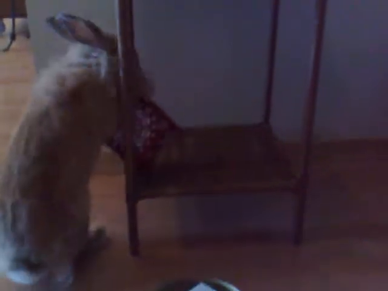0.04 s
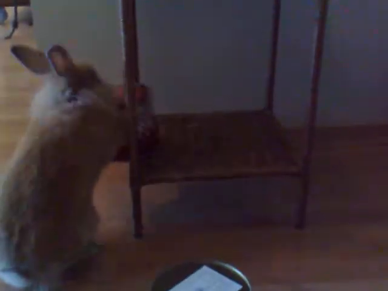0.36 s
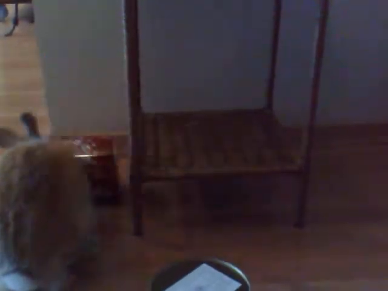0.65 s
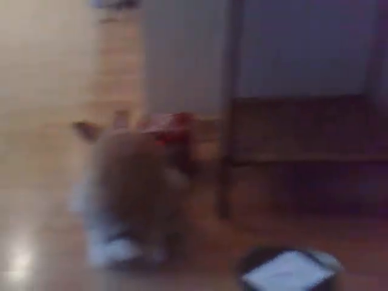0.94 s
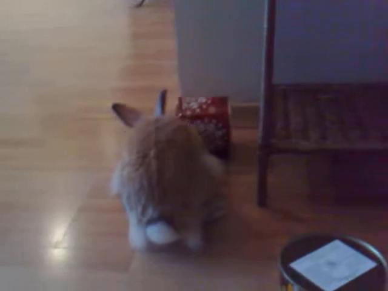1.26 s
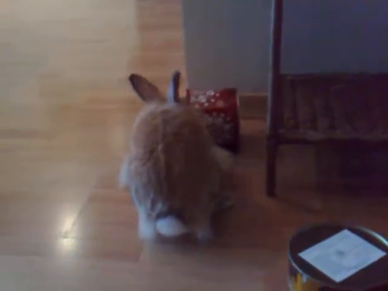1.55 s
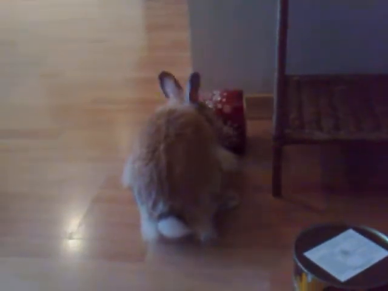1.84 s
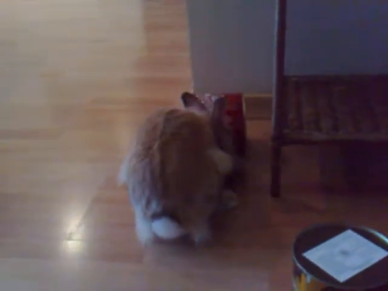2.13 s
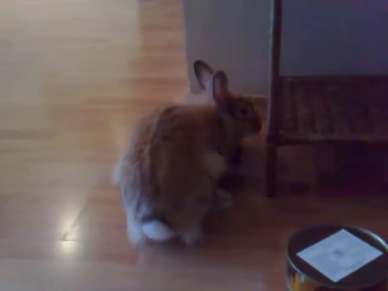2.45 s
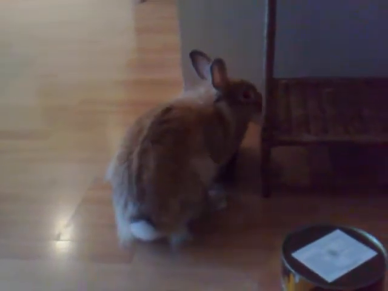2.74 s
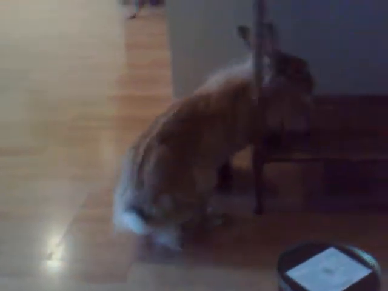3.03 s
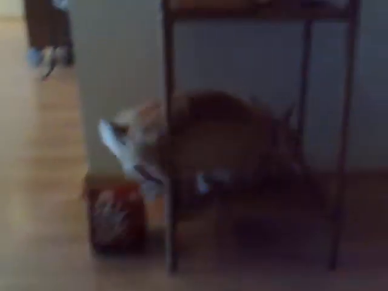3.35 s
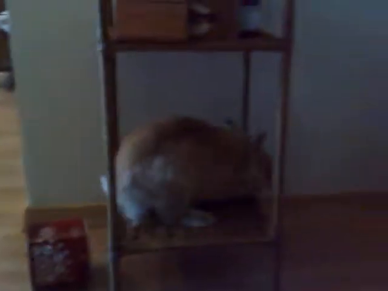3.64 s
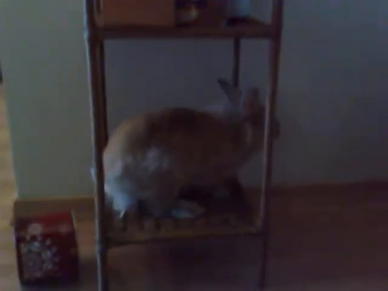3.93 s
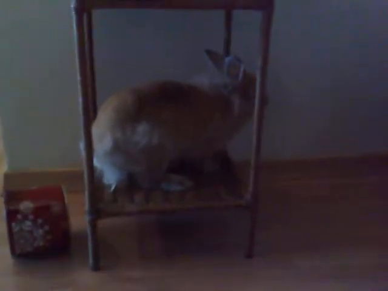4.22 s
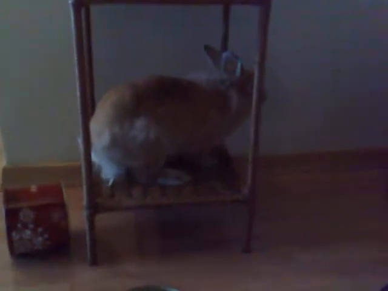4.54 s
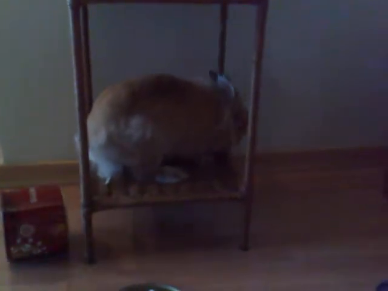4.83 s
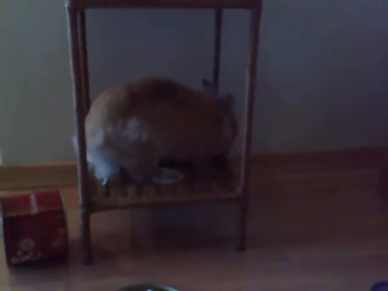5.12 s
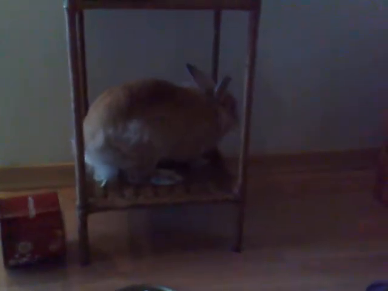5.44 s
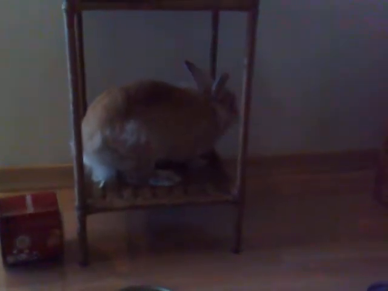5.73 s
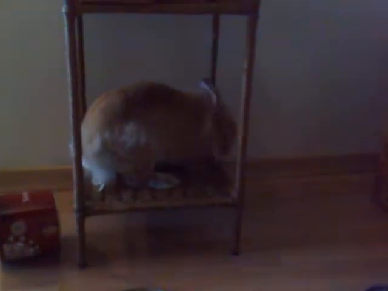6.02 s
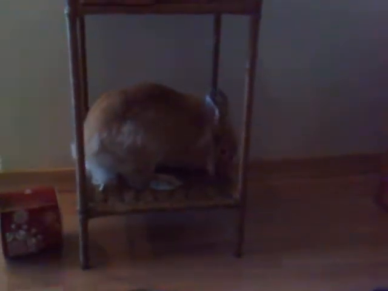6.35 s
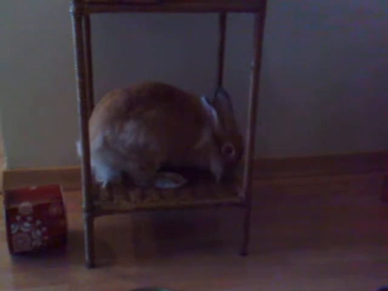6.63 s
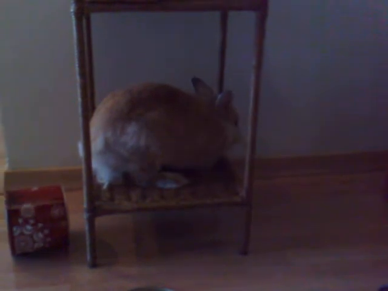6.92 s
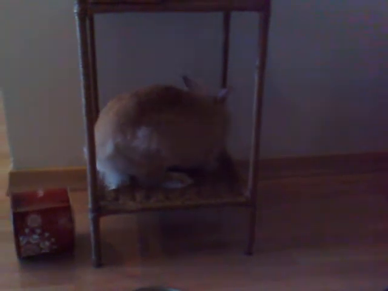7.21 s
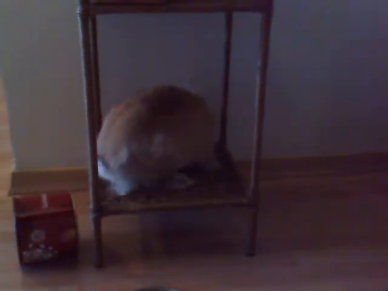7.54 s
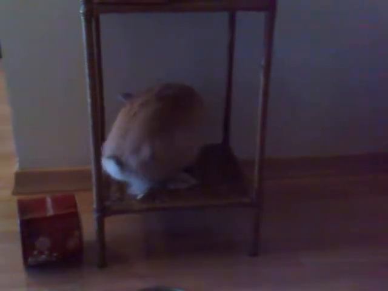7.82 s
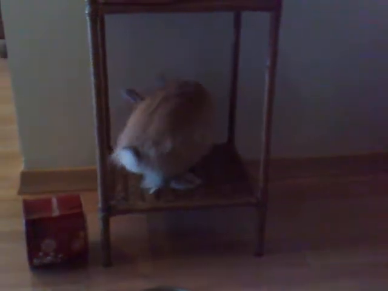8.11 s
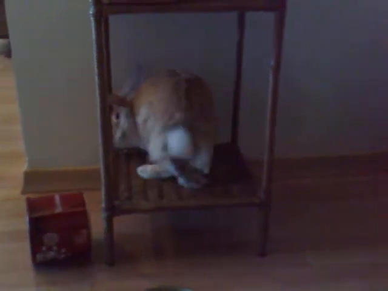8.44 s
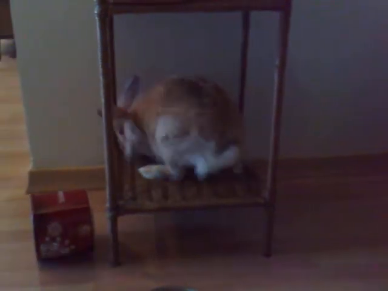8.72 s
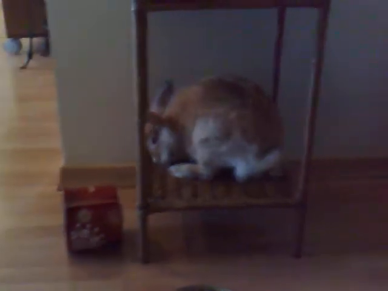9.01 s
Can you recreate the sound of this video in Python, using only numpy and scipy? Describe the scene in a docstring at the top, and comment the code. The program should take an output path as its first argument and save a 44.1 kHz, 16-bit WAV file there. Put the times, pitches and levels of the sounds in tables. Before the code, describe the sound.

Light knocks and scrapes on wood end in a loud, ringing tin crash, followed by a rabbit's soft shuffling over faint traffic hum.

```python
"""An empty tin, dragged by a rabbit, bumps and scrapes over a slatted wooden shelf in a quiet room.
At 0.85 s it crashes on the floor, modes ringing and walls rattling; gain control clamps down,
then lets the background swell back. The rabbit shuffles: claws tick, fur brushes, paws thud.
At 3.5 s it hops onto the shelf and a joint cracks under it; more shuffling follows.
Throughout: faint traffic through the walls and microphone hiss, later joined by two thin whistles."""
import sys
import numpy as np
from scipy import signal
from scipy.fft import rfft, irfft
from scipy.io import wavfile
from scipy.ndimage import uniform_filter1d, minimum_filter1d

SR = 44100
rng = np.random.default_rng(int(sys.argv[2]) if len(sys.argv) > 2 else 0)


def output_pcm(signal):
    """Save a mono or channel-first signal as 16-bit PCM at the path in sys.argv[1].

    Samples are clipped to [-1, 1] before scaling.
    """
    pcm = np.clip(np.atleast_2d(signal).T, -1, 1) * 32767
    wavfile.write(sys.argv[1], SR, np.round(pcm).astype(np.int16))


N = 399987
TIME_S = np.arange(N) / SR
RING_TIME_S = np.arange(SR) / SR

# tin on shelf: t/s, force/dB, hardness cutoff/Hz, board ring/dB
SHELF_HITS = [(.004, -26, 3500, -6.5), (.073, -38, 500, 3.5), (.183, -26, 1460, 7),
              (0.211, -23, 2200, -3.5), (.303, -27.5, 446, 2), (.362, -24.5, 5000, -6.5),
              (0.378, -26, 2200, -10), (0.509, -35.5, 697, 0), (.587, -13.5, 2220, -5.5),
              (.618, -23.5, 1600, -12.5), (.664, -31, 2200, -8), (.75, -42.5, 900, -2),
              (.795, -35, 1300, -8.5)]
# tin on floor: t/s, force/dB
FLOOR_HITS = [(.854, 6), (.863, 3), (.871, 6), (0.88, -5), (.893, -4), (.924, -3.5)]
LANDING_S = FLOOR_HITS[0][0]

def tin_blows(rim_hz=7000, soften_s=.05):
    """Shelf bumps, then the floor: rim first, flat side ever duller. t/s, ring/dB, cutoff/Hz, rattle/dB."""
    on_shelf = [(s, db - 13, hard_hz, db - 4.5) for s, db, hard_hz, _ in SHELF_HITS]
    on_floor = [(s, db - 1.5, rim_hz * np.exp((LANDING_S - s) / soften_s), db - 1.5)
                for s, db in FLOOR_HITS]
    return on_shelf + on_floor


# bottom and sides: f/Hz, level/dB, unstretched t60/s
TIN_MODES = [(152, -14, .55), (246, -11, .55), (262, -8, .3), (292, -13, .5), (356, -18, .5),
             (390, -17, .5), (456, -18, .5), (497, -3, .32), (510, -2, .4), (534, -8, .45), (556, -10, .35),
             (645, -7, .35), (661, -4, .46), (681, -1, .47), (759, -8, .44), (790, -10, .44),
             (926, -15, .38), (1044, -15, .45), (1320, -16, .4), (1681, -17, .35), (1960, -17, .35),
             (2790, -22, .35), (2971, -18, .35), (3310, -23, .3)]

def tin_ring(modes_db=-4, tumble_depth=.85, t60_stretch=1.064):
    """Blows feed energy to each mode; tumbling turns the ringing faces to and from the listener."""
    out = np.zeros(N)
    s, force_db, hard_hz, _ = np.transpose(tin_blows())
    for hz, db, t60_s in TIN_MODES:
        fed = np.zeros(N)
        fed[(s * SR).astype(int)] = amp(force_db) ** 2 / (1 + (hz / hard_hz) ** 2)
        kept_per_sample = amp(-120 / (t60_s * t60_stretch * SR))
        stored = signal.lfilter([1], [1, -kept_per_sample], fed + 1e-20)
        envelope = cut(np.sqrt(stored), 250, "low", order=2)
        tumble = 1 + tumble_depth * wander(hz=27)
        out += amp(db + modes_db) * envelope * tumble * np.sin(2 * np.pi * hz * TIME_S)
    return out


# dense wall overtones: f/Hz, density/dB
WALL_SPECTRUM = [(50, -29), (130, -10.5), (270, 1.5), (380, -7), (600, 6.5), (900, -4.5), (1200, -8),
                 (1900, -10), (2600, -16.5), (3800, -13.5), (5500, -12.5), (8000, -19.5), (15000, -24)]
# their decay: f/Hz, t60/s
WALL_DECAY = [(150, 0.26), (700, 0.14), (2500, 0.42), (6000, 0.073), (14000, 0.24)]

def tin_rattle(walls_db=-3):
    """Each blow rattles the tin's walls; soft blows lose the treble."""
    out = np.zeros(N)
    for s, _, hard_hz, db in tin_blows():
        walls = fade(noise(SR, WALL_SPECTRUM), WALL_DECAY)
        add(out, s, amp(walls_db + db) * cut(walls, hard_hz, "low", order=1))
    return out


# rim rasp: f/Hz, density/dB
RIM_SPECTRUM = [(1000, -1.5), (3000, 4), (4300, 6), (5500, 2), (8000, 1.5), (12000, 3), (15500, 5)]

def skid(decay_s, low_hz, high_hz, slips_per_s=2500, slip_db=4):
    """Tiny slips over a smooth rasp, dying as the rim stops."""
    friction = rng.standard_normal(SR)
    slips = rng.random(SR) < slips_per_s / SR
    rasp = colour(friction * (1 + amp(slip_db) * slips), RIM_SPECTRUM)
    bright = unit(cut(rasp, low_hz, "high", order=3))
    return cut(bright, high_hz, "low", order=2) * np.exp(-RING_TIME_S / decay_s)


# skids on the slats: t/s, level/dB, decay/s, centre/Hz
SKIDS = [(.005, -29.5, .012, 5740), (.181, -34.5, 0.018, 4440), (.201, -25, 0.035, 7330),
         (.251, -21, 0.021, 8000), (.336, -21, 0.014, 7560), (.5094, -29.5, 0.012, 4200),
         (0.692, -37, 0.0063, 4500), (3.28, -44.5, 0.012, 4300)]

def scrapes(band_ratio=1.76, landing_db=3):
    """The rim, later a paw, skids over the slats; one short, hard skid as the rim meets the floor."""
    out = np.zeros(N)
    for s, db, decay_s, hz in SKIDS:
        add(out, s, amp(db) * skid(decay_s, hz / band_ratio, hz * band_ratio))
    add(out, LANDING_S, amp(landing_db) * skid(decay_s=.002, low_hz=3000, high_hz=6000))
    return out


# shelf boards: f/Hz, level/dB, t60/s
BOARD_MODES = [(160, -9, .14), (215, -9, .1), (272, 0, .12), (300, 0, .3), (325, -5, .18), (505, -14, .1),
               (715, -17, .25)]
# dead push under a bump: f/Hz, level/dB, t60/s
THUD_MODES = [(171, -0.5, 0.032), (254, -7.5, 0.11), (497, -0.5, 0.02)]
# footfalls: t/s, level/dB
PAW_STEPS = [(2.687, -37), (4.11, -38), (4.22, -44)]
# floorboard thud: f/Hz, density/dB
FLOOR_SPECTRUM = [(60, -11), (150, 4), (260, 0), (450, -8.5), (1000, -19), (15000, -67)]

def bumps(tin_hz=380, paw_hz=550, paw_ring_db=-10.5, floor_db=-19):
    """Tin and paws thud on the shelf and ring its boards; the floor only thuds."""
    out, boards, thud = np.zeros(N), ring(BOARD_MODES), ring(THUD_MODES)
    for s, db, _, ring_db in SHELF_HITS:
        add(out, s, amp(db) * cut(thud + amp(ring_db) * boards, tin_hz, "low", order=2))
    for s, db in PAW_STEPS:
        add(out, s, amp(db) * cut(thud + amp(paw_ring_db) * boards, paw_hz, "low", order=2))
    for s, db in FLOOR_HITS:
        add(out, s, amp(db + floor_db) * burst(FLOOR_SPECTRUM, decay_s=.012))
    return out


# shelf frame: f/Hz, density/dB
FRAME_SPECTRUM = [(150, -19), (400, -1), (600, 0), (830, 0.5), (1200, -8), (1750, -8), (2050, -8.5),
                  (2450, -9.5), (2900, -19.5), (4500, -15), (8000, -24.5), (15000, -22)]

def knocks(frame_db=1):
    """The frame clacks at each bump, too damped to hold a pitch."""
    out = np.zeros(N)
    for s, db, hard_hz, _ in SHELF_HITS:
        clack = burst(FRAME_SPECTRUM, decay_s=.013)
        add(out, s, amp(db + frame_db) * cut(clack, hard_hz, "low", order=1))
    return out


# joint slips: t/s, level/dB, high-pass/Hz
JOINT_SNAPS = [(3.4867, -24, 3220), (3.4898, -24, 900), (3.499, -44, 1200)]
# one snap: f/Hz, density/dB
SNAP_SPECTRUM = [(400, -19), (1200, -6), (2200, 2.5), (3200, -2), (4200, -2), (4600, -5.5), (5200, -2),
                 (6000, -7), (8500, -10), (12000, -15), (15500, -19)]
# joint's thin ring: f/Hz, level/dB, t60/s
JOINT_MODES = [(1200, -20, .1), (1812, -17, .2), (2060, -14, .2), (2165, -16, .18), (2396, -22, .25),
               (3413, -19, .28), (3926, -14, .17), (4101, -16, .17), (4152, -13, .15), (4181, -11, .22),
               (4238, -15, .34), (4866, -22, .16), (5230, -25, .13), (6735, -21, .11)]
# its heavily damped modes: f/Hz, level/dB, t60/s
CLACK_MODES = [(4240, -0.5, 0.053), (5250, 2.5, 0.025)]

def crack(ring_db=-23, clack_db=-2):
    """A shelf joint slips under the rabbit in quick snaps; the first sets off a clack and a thin ring."""
    snaps, ringing = np.zeros(N), np.zeros(N)
    for s, db, low_hz in JOINT_SNAPS:
        snap = burst(SNAP_SPECTRUM, decay_s=.0034)
        add(snaps, s, amp(db) * cut(snap, low_hz, "high", order=2))
    s, db, _ = JOINT_SNAPS[0]
    add(ringing, s, amp(ring_db) * ring(JOINT_MODES) + amp(db + clack_db) * ring(CLACK_MODES))
    return ringing + room(snaps, wet_db=-4.5)


# claws and dry joints: t/s, level/dB, slat pitch/Hz
WOOD_TICKS = [(1.621, -42, 3050), (2.612, -46, 1250), (2.627, -42, 2600), (2.687, -45, 3100),
              (5.083, -44, 2250), (5.112, -39, 2300), (5.114, -44, 4100)]
# one tick: f/Hz, density/dB
TICK_SPECTRUM = [(300, -10), (1000, -4), (2300, 1), (3100, -2), (4200, -6), (6500, -19), (15000, -30)]

def ticks(hard_hz=1760, faint_count=9, faint_db=-55, faint_hz=2100, shuffle_s=(1.4, 7.7)):
    """Claws and joints click and briefly ring a slat; fainter ticks fall at random during the shuffle."""
    out = np.zeros(N)
    faint = [(np.interp(when, (0, 1), shuffle_s), faint_db, faint_hz * 2 ** (pitch - .5))
             for when, pitch in rng.random((faint_count, 2))]
    for s, db, hz in WOOD_TICKS + faint:
        click = burst(TICK_SPECTRUM, decay_s=.006) + ring([(hz, 2, .035)])
        add(out, s, amp(db) * cut(click, hard_hz, "low", order=1))
    return out


# rabbit's movements: t/s, level/dB, half width/s
BODY_SHIFTS = [(2.7, -58, .12), (4.27, -50, .28), (5.45, -54.5, 0.16), (6.1, -63, .2), (8.1, -59, 0.28),
               (8.85, -57, 0.35)]
# fur and paws on wood: f/Hz, density/dB
FUR_SPECTRUM = [(200, 0), (400, 6.5), (1200, -6), (2200, -10.5), (3500, -22), (15000, -54)]

def rustle():
    """Each shift of the body is a soft swell of brushing fur."""
    envelope = sum(amp(db) * bell(s, width_s) for s, db, width_s in BODY_SHIFTS)
    return envelope * noise(N, FUR_SPECTRUM)


# engines pulling or slowing: start/s, end/s, first firing rate/Hz, last firing rate/Hz, level/dB
ENGINE_RUNS = [(1.0, 1.788, 106.6, 104.2, -48.5), (2.15, 3.417, 93.2, 110.5, -42.5),
               (3.48, 4.4, 114.1, 82.2, -43), (4.95, 6.353, 140.7, 151.1, -45),
               (6.55, 6.998, 154.2, 155.6, -46.5), (7.05, 9.208, 100.3, 106.7, -53.5)]

def engines(boom_hz=104.66, boom_width_hz=4.3, boom_db=11, octave_db=-24, ramp_s=.19):
    """Walls pass little but the firing tone, which booms as it crosses a room resonance."""
    out = np.zeros(N)
    for start_s, end_s, first_hz, last_hz, db in ENGINE_RUNS:
        t = np.arange(0, end_s - start_s, 1 / SR)
        hz = np.linspace(first_hz, last_hz, len(t))
        phase = 2 * np.pi * np.cumsum(hz) / SR
        boom = 1 + (amp(boom_db) - 1) / (1 + (2 * (hz - boom_hz) / boom_width_hz) ** 2)
        tone = np.sqrt(2) * (boom * np.sin(phase) + amp(octave_db) * np.sin(2 * phase))
        flutter = 1 + .11 * wander(hz=17)[:len(t)]
        envelope = np.minimum(np.minimum(t, t[::-1]) / ramp_s, 1)
        add(out, start_s, amp(db) * tone * flutter * envelope)
    return out


# street through the walls: f/Hz, density/dB
STREET_SPECTRUM = [(12, -2.5), (28, 2.5), (45, 1), (64, -6), (105, 0.5), (160, -5.5), (210, -11.5),
                   (300, -15), (550, -22.5), (1000, -27), (2000, -31), (2800, -38.5), (5000, -48),
                   (9000, -58)]
# level lifts ahead of gain control: t/s, lift/dB, half width/s
STREET_LIFTS = [(.2, 2.5, 0.54), (1.2, 9, .4)]

def street(base_db=-41):
    """Low, steady traffic wash; a bit louder at first, lifted after the crash to offset the gain dip."""
    lift_db = sum(db * bell(s, width_s) for s, db, width_s in STREET_LIFTS)
    return amp(base_db + lift_db) * noise(N, STREET_SPECTRUM)


# background whistles: start/s, end/s, f/Hz, level/dB
WHISTLE_TONES = [(3.9, 8.3, 1370, -71), (7.7, 9.07, 2330, -72.5)]

def whistles(flicker_depth=.93):
    """Faint, thin tones come, flicker and go."""
    out = np.zeros(N)
    for start_s, end_s, hz, db in WHISTLE_TONES:
        gate = cut(1. * ((TIME_S > start_s) & (TIME_S < end_s)), 2.5, "low", order=1)
        flicker = 1 + flicker_depth * wander(hz=29)
        out += amp(db) * gate * flicker * np.sin(2 * np.pi * hz * TIME_S)
    return out


# noise floor: f/Hz, density/dB
HISS_SPECTRUM = [(1000, -10.5), (5000, 3.5), (10000, 2.5), (15500, 5.5)]

def hiss(db=-68.5):
    """Microphone self-noise."""
    return amp(db) * noise(N, HISS_SPECTRUM)


# reverberation: f/Hz, t60/s
ROOM_T60 = [(120, 0.65), (500, 0.73), (2000, 0.52), (4000, 0.53), (6000, 0.43), (9000, 0.27), (15000, 0.21)]

def room(x, wet_db, build_s=.0057, echoes_per_s=4000):
    """Dense reflections build up after the direct sound and die band by band."""
    taps = rng.choice([-1, 1], SR) * (rng.random(SR) < echoes_per_s / SR)
    tail = fade(taps, ROOM_T60) * (1 - np.exp(-RING_TIME_S / build_s))
    return x + amp(wet_db) * signal.fftconvolve(x, tail / np.linalg.norm(tail))[:N]


def amp(db):
    """Decibels to gain."""
    return 10 ** (np.asarray(db) / 20)


def unit(x):
    """Scale to rms 1."""
    return x / np.sqrt(np.mean(x ** 2) + 1e-20)


def read(points, hz):
    """Interpolate a table over log frequency."""
    table_hz, value = np.transpose(points)
    return np.interp(np.log(hz + 1), np.log(table_hz + 1), value)


def add(mix, s, sound):
    """Mix a sound in at time s."""
    part = mix[max(round(s * SR), 0):][:len(sound)]
    part += sound[:len(part)]


def colour(x, spectrum):
    """Filter by a spectrum table, rms 1."""
    gain = amp(read(spectrum, np.fft.rfftfreq(len(x), 1 / SR)))
    return unit(irfft(rfft(x) * gain, len(x)))


def noise(samples, spectrum):
    """Coloured noise, rms 1."""
    return colour(rng.standard_normal(samples), spectrum)


def cut(x, hz, kind, order):
    """Low-pass or high-pass."""
    return signal.sosfilt(signal.butter(order, hz, kind, fs=SR, output="sos"), x)


def fade(x, decay):
    """Decay each band at its own t60."""
    hz, t, bands = signal.stft(x, nperseg=256, fs=SR)
    gain = amp(-60 * t / read(decay, hz)[:, None])
    return signal.istft(bands * gain, nperseg=256)[1][:len(x)]


def ring(modes):
    """Decaying modes of a struck body."""
    return sum(amp(db - 60 * RING_TIME_S / t60_s) * np.sin(2 * np.pi * hz * RING_TIME_S)
               for hz, db, t60_s in modes)


def burst(spectrum, decay_s):
    """Sharp puff of coloured noise."""
    return noise(SR, spectrum) * np.exp(-RING_TIME_S / decay_s)


def bell(s, width_s):
    """Smooth bump, 1 at time s."""
    return np.exp(-((TIME_S - s) / width_s) ** 2)


def wander(hz):
    """Slow random drift, rms 1."""
    return unit(cut(rng.standard_normal(N), hz, "low", order=2))


def scene():
    """Tin, shelf and rabbit in the room, over traffic, whistles and hiss."""
    tin = tin_ring() + room(tin_rattle(), wet_db=-7)
    wood = room(scrapes(), wet_db=-9.5) + room(bumps(), wet_db=-5.5) + room(knocks(), wet_db=-4.5)
    fall = cut(tin + wood, 120, "high", order=3)  # tin and wood are thinned out below 120 Hz
    rabbit = room(ticks(), wet_db=-11) + crack() + rustle()
    background = street() + engines() + whistles() + hiss()
    return (fall + rabbit + background)[None]


def record(dry, limit_db=-6, hold_s=.44, recovery_db_per_s=23, ceiling=.66, edge_hz=15850):
    """Gain control drops at once, holds and recovers slowly; then soft clip and band limit."""
    x = dry[0]
    power_db = 10 * np.log10(abs(uniform_filter1d(x ** 2, size=350)) + 1e-12)
    over_db = np.maximum(power_db - limit_db, 0)
    half_hold = int(hold_s * SR) // 2
    held_db = -minimum_filter1d(-over_db, 2 * half_hold + 1, origin=half_hold, mode="constant")
    recovery_db = TIME_S * recovery_db_per_s
    duck_db = np.maximum.accumulate(held_db + recovery_db) - recovery_db
    clipped = ceiling * np.tanh(x * amp(-duck_db) / ceiling)
    low_pass = signal.firwin(511, edge_hz, window=("kaiser", 9), fs=SR)
    return signal.oaconvolve(clipped, low_pass, "same")[None]


dry = scene()
out = record(dry)
output_pcm(out)
```